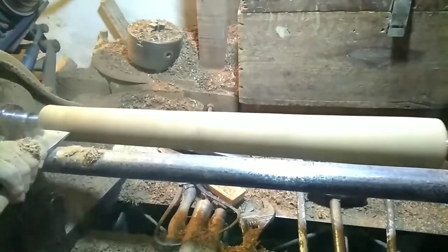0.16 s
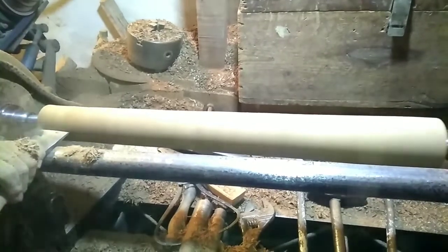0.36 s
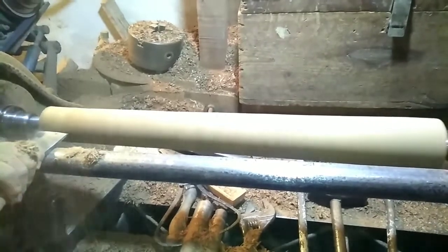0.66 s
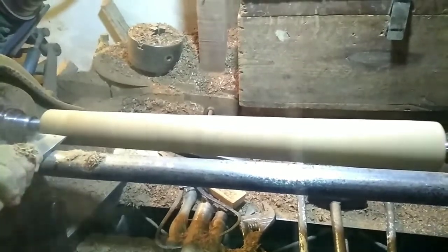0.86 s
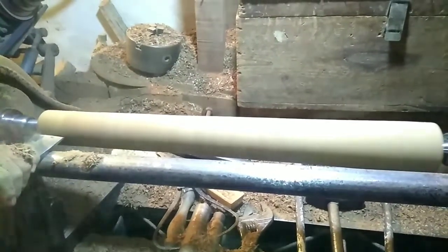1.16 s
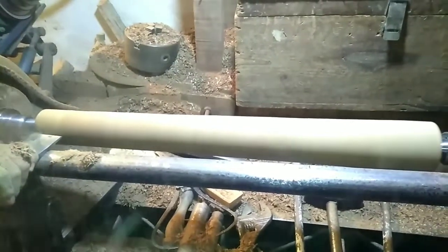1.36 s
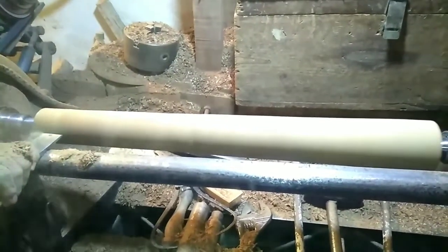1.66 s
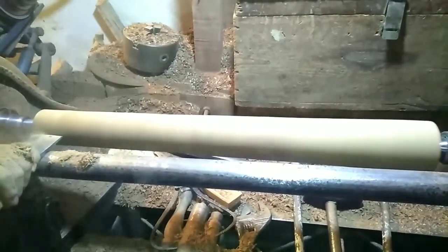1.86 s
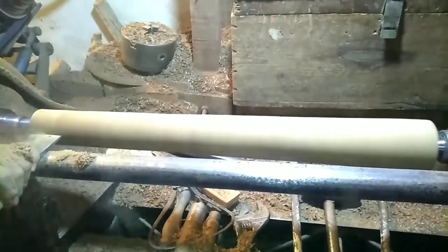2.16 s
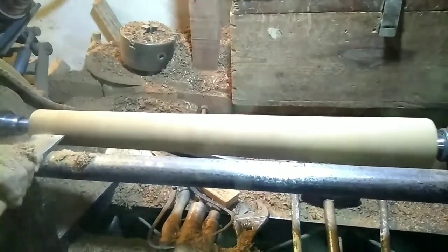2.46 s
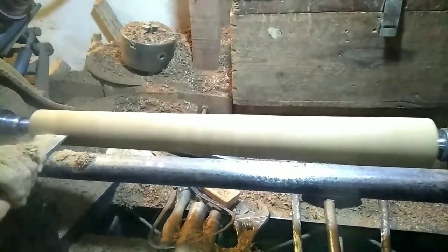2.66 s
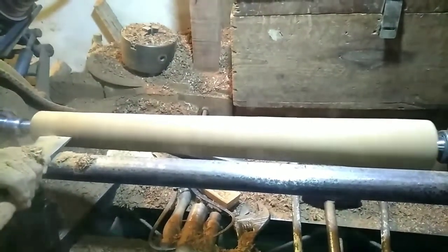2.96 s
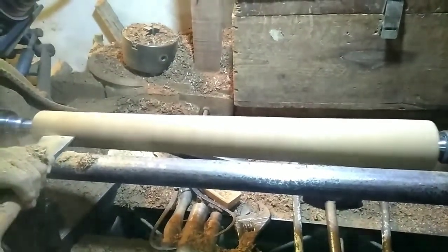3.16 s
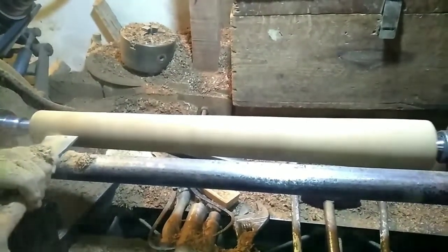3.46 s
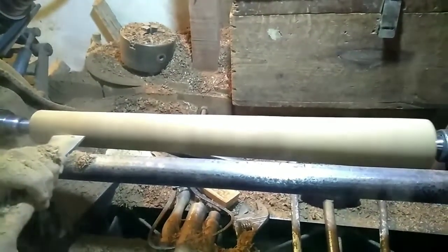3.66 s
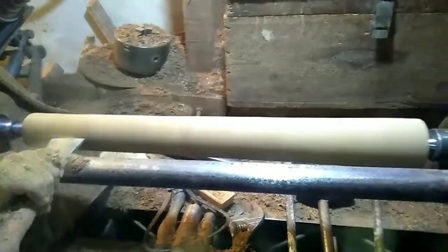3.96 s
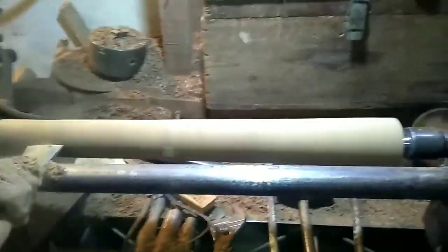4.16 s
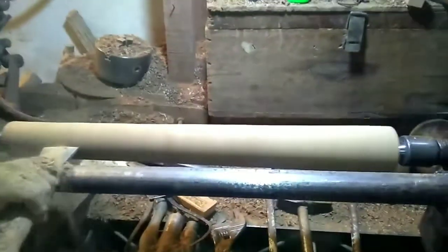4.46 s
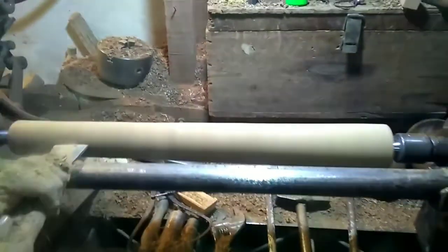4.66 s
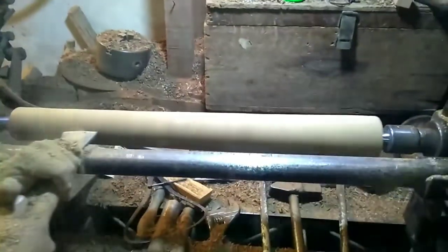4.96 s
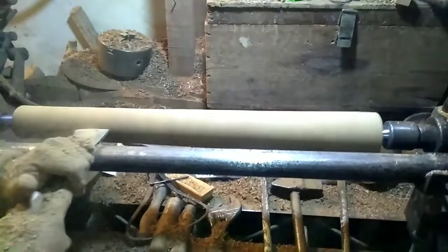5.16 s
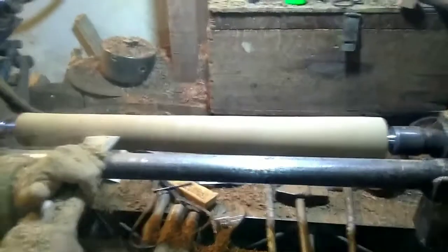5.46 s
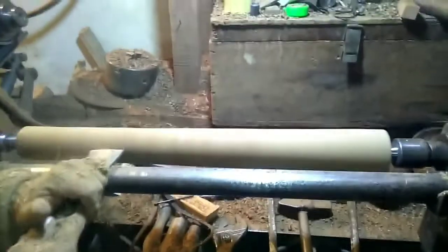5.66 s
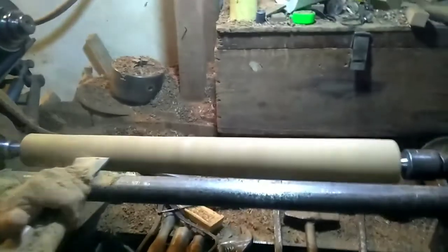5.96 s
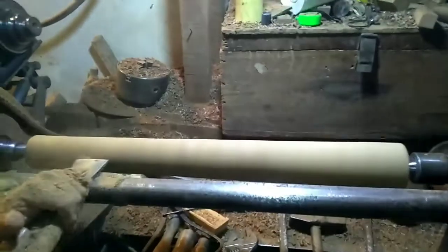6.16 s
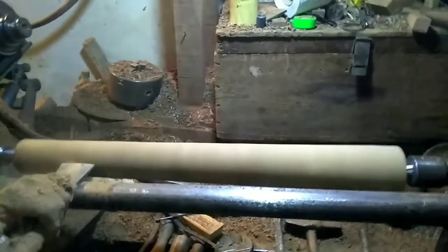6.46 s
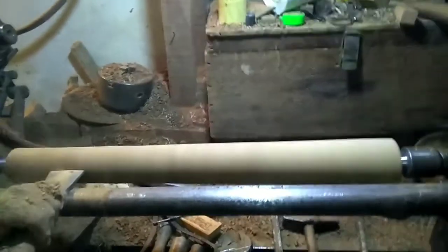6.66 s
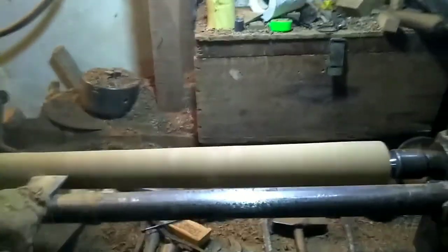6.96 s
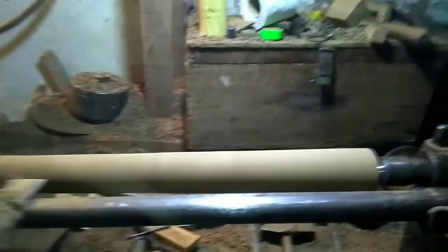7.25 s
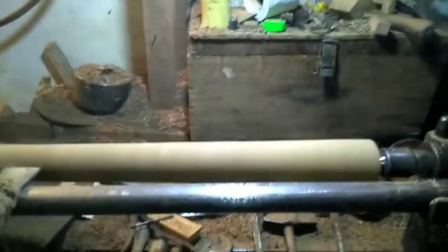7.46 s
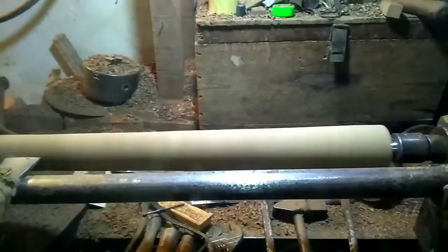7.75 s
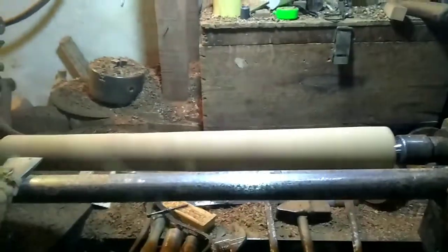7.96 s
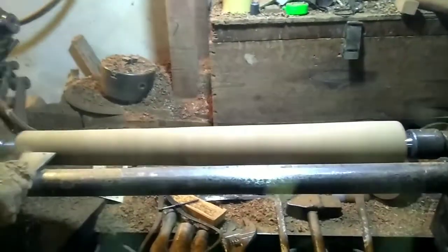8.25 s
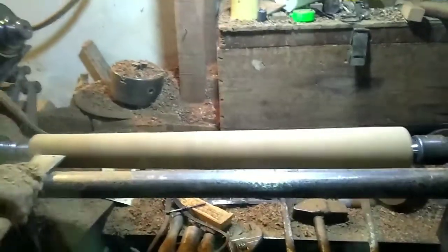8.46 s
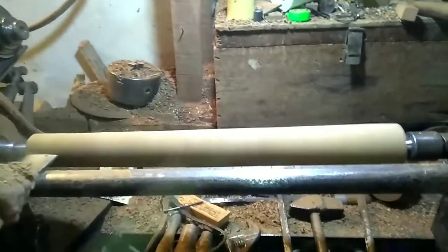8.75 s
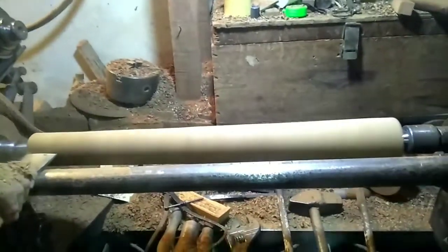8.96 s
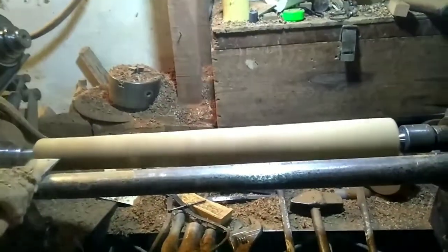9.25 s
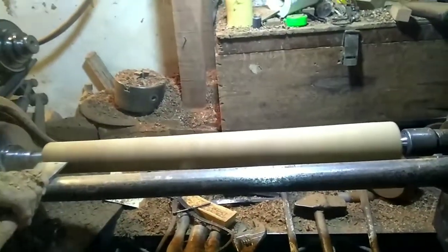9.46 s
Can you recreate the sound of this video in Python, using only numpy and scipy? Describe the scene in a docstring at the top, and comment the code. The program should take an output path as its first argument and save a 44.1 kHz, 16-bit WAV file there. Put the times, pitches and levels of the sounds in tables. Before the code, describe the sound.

A flat hand tool shaves a long wooden blank spinning on a lathe, close by in a small workshop. The scraping hiss pulses rapidly at first, with ringing chatter, short squeaks and crackling chips. Midway the cut turns into a freer, sputtering ring with a thin high squeal. The edge catches sharply several times, then the pulsing shaving returns. A motor hum and bearing rumble run underneath.

```python
"""A long wooden blank chatters on a lathe in a small workshop while a flat hand tool shaves along it.
Once a turn the high side bites the edge: the shaving hiss pulses and blank and tool ring, in step with
the spindle at both ends of the pass and freely in between. The steel squeals thinly; now and then it
digs in, catches or skids, and chips fly. Underneath, the rubbing bevel shakes the bed, the motor hums
and the bearings rumble."""
import sys
import numpy as np
from scipy import signal
from scipy.fft import rfft, irfft
from scipy.io import wavfile
from scipy.ndimage import uniform_filter1d

SR = 44100
rng = np.random.default_rng(int(sys.argv[2]) if len(sys.argv) > 2 else 0)


def persist_wave(psi):
    """Save psi, clipped to +-1, as 16-bit WAV."""
    counts = np.round(np.clip(psi, -1, 1) * 32767).astype(np.int16)
    wavfile.write(sys.argv[1], SR, np.atleast_2d(counts).T)


N = 423360

SPINDLE_HZ = 39.4
LOWER_HZ, MIDDLE_HZ = 1668, 1785  # bending modes of the blank
ROCK_HZ, ROCK_DB, ROCK_TOP_S = 2.5, 0.86, 0.039  # the tool rocks in and out of the cut at first
CHATTER_FOLLOWS, TOOL_FOLLOWS, HISS_FOLLOWS = 0.97, 1.8, 0.94  # dB per dB of hand pressure

# how the edge meets the wood:
# (time [s], bite start [turns], bite length [turns], chatter swell [turns], in step [0-1])
BITE = [(0, 0.48, 0.21, 0.23, 0.8), (.45, 0.55, 0.22, 0.2, 0.74), (1.2, 0.5, 0.15, 0.21, 0.64),
        (2.0, 0.52, 0.17, 0.18, 0.84), (2.35, 0.57, 0.13, 0.17, 0.77), (2.6, 0.51, 0.13, 0.58, 0.7),
        (3.1, 0.48, 0.18, 0.14, 0.58), (3.4, 0.42, 0.083, 0.24, 0.6), (3.7, 0.41, 0.12, 0.083, 0.2),
        (4.7, -0.19, 0.11, 0.062, 0), (6.3, -0.064, 0.1, 0.15, 0.18), (7.4, 0.089, 0.16, 0.12, 0),
        (7.7, 0.065, 0.23, 0.17, 0.41), (8.1, -0.068, 0.1, 0.23, 0.64), (8.4, -0.054, 0.38, 0.17, 0.79),
        (8.75, -0.097, 0.18, 0.15, 0.71), (9.0, -0.1, 0.19, 0.16, 0.83), (9.6, -0.13, 0.13, 0.22, 0.84)]
# the hand leans in (+) or eases off (-): (time [s], half-length [s], pressure [dB])
NUDGES = [(1.486, 0.03, -3.5), (1.84, 0.017, -1), (3.576, 0.064, 1), (4.06, 0.045, -2), (4.42, 0.027, 1.5),
          (5.455, 0.044, -4), (5.736, 0.041, -2), (6.265, 0.04, 1.5), (6.658, 0.02, -2), (6.771, 0.013, -5),
          (7.451, 0.023, -4.5), (7.538, 0.047, -4.5), (7.62, 0.058, 2), (7.827, 0.024, 1.5),
          (8.653, 0.028, 0.5), (8.737, 0.03, -5), (9.352, 0.034, 2.5)]

# faders of the blank's three bending modes, before trim: (time [s], level [dB])
LOWER_CHATTER = [(0, -43), (.4, -40), (.65, -51), (1.0, -48), (1.3, -47.5), (1.45, -40), (1.8, -47),
                 (1.94, -37.5), (2.08, -44), (2.3, -36.5), (2.48, -57), (3.0, -48.5), (3.5, -52),
                 (4.45, -53), (4.75, -62), (4.95, -51), (5.6, -48), (6.1, -54), (7.3, -50.5), (8.15, -41),
                 (8.43, -34), (8.8, -40), (9.0, -35), (9.3, -36), (9.6, -40)]
MIDDLE_CHATTER = [(0, -41.5), (.25, -51), (.4, -43), (.6, -47), (1.1, -56), (1.35, -44), (1.5, -48),
                  (1.62, -40.5), (1.83, -52), (1.95, -41), (2.25, -40), (2.55, -66), (3.3, -50),
                  (3.7, -44.5), (4.05, -43), (4.4, -42), (4.8, -50), (5.1, -44), (5.4, -44), (5.56, -45),
                  (5.7, -60), (9.6, -64)]
UPPER_CHATTER = [(0, -64), (.4, -49), (.95, -52), (1.6, -44.5), (2.1, -46), (2.6, -53), (3.35, -51),
                 (3.72, -43), (4.0, -43.5), (4.7, -40), (5.52, -43), (5.68, -51.5), (5.9, -43.5),
                 (6.55, -38.5), (7.0, -48), (7.95, -59), (8.38, -47), (8.7, -52), (9.6, -53.5)]
# the upper mode climbs as the tool leaves the end of the blank: (time [s], pitch [Hz])
UPPER_PITCH = [(0, 1860), (2.2, 1860), (3.7, 1875), (5.5, 1885), (6.2, 1900), (7.4, 1900), (9.6, 1915)]
# it is gripped and swells (+) or slips and fades (-): (time [s], half-length [s], gain [dB])
UPPER_SWELLS = [(3.577, 0.015, 9), (3.653, 0.012, -14), (3.735, .05, 6.5), (4.02, 0.046, -11),
                (4.249, 0.014, 5), (4.44, 0.022, 3), (4.61, 0.012, 9), (4.82, 0.035, 7), (4.928, .02, -4),
                (5.094, 0.026, -20), (5.32, 0.035, -12), (5.407, 0.018, 8), (5.468, 0.028, 13.5),
                (5.557, 0.024, 5), (5.91, 0.011, -16), (5.95, 0.047, 8), (6.018, 0.045, -3.5),
                (6.268, 0.015, -5), (6.34, .03, 4.5), (6.42, 0.014, 0.5), (6.897, 0.037, -5),
                (7.04, 0.014, 5), (7.24, 0.11, 7.5), (7.426, 0.024, 9)]

# faders of shaving hiss, dust sizzle and chip crackle, before trim: (time [s], level [dB])
SHAVING_LEVEL = [(0, -45.5), (.4, -44.5), (1.1, -44), (1.6, -45.5), (2.1, -50.5), (2.5, -42.5),
                 (3.1, -43.5), (3.6, -44.5), (4.45, -48), (4.9, -44.5), (5.6, -47), (6.3, -45),
                 (7.0, -46.5), (7.54, -44.5), (7.6, -43.5), (8.35, -44.5), (8.45, -48), (9.1, -48.5),
                 (9.6, -46.5)]
DUST_LEVEL = [(0, -49), (.7, -51), (1.05, -43), (1.45, -57), (2.1, -47), (2.62, -45), (2.96, -45),
              (3.3, -43), (3.8, -45.5), (5.2, -47.5), (7.4, -47.5), (7.7, -48), (8.3, -46), (9.1, -53),
              (9.5, -51)]
CRACK_LEVEL = [(0, -53), (.7, -50), (1.4, -49.5), (2.1, -54.5), (2.4, -52), (3.1, -54), (3.7, -70),
               (7.5, -68), (7.7, -59), (8.7, -64), (8.85, -49), (9.05, -50), (9.25, -60), (9.36, -59),
               (9.6, -63)]
# their tone colours: (frequency [Hz], relative level [dB])
SHAVING_EQ = [(500, -8), (1200, 5), (1700, 13.5), (2200, 5), (2850, -3.5), (4000, 1.5), (4600, 2.5),
              (5000, 0), (5400, 3), (5850, 2), (6380, -5), (7100, 5), (8000, 2.5), (9500, 0.5),
              (12000, -1.5), (16500, 2.5)]
DUST_EQ = [(10000, -10), (12000, -4.5), (13000, -4), (13600, -2), (14200, 2.5), (14900, 5), (15300, 8.5),
           (15600, 7)]
CRACK_EQ = [(2200, -18), (3500, 8), (5500, 0), (8000, -2), (13000, -15)]
# how much the flat of the edge rings in the hiss: (time [s], share [0-1])
FLAT_SHARE = [(0, 0.16), (2.2, 0.27), (2.45, 0.06), (3.3, 0.16), (3.65, 0.35), (4.0, 0.52), (4.8, 0.38),
              (6.5, 0.38), (7.4, 0.38), (7.7, 0.12), (9.6, 0.22)]

# resonances of the edge's flat, the struck tool, the rubbed tool, the rasp and ripping fibres:
# (frequency [Hz], width [Hz], gain [dB])
FLAT_MODES = [(6316, 206, 12.6), (8030, 620, 10.3), (10240, 1400, 1.6)]
STRUCK_MODES = [(2060, 320, -5), (2502, 23, 8), (3313, 114, -1.5), (3620, 98, 3), (4200, 380, -11)]
RUBBED_MODES = [(2904, 130, 0.5), (3395, 230, 9.5), (3720, 200, 5), (4190, 250, 5.5)]
RASP_MODES = [(2040, 110, -1.5), (2410, 140, -10), (3650, 150, -3.5), (4040, 120, -2), (4400, 300, -6)]
RIP_MODES = [(1760, 590, 0), (4000, 3000, -16)]
# faders of the tool's ring and the edge's squeal, before trim: (time [s], level [dB])
TOOL_LEVEL = [(0, -54.5), (.6, -50), (1.2, -48), (2.05, -48.5), (2.55, -52.5), (2.9, -55), (4.4, -53.5),
              (4.9, -51), (5.7, -52.5), (6.95, -55), (7.2, -52.5), (7.8, -55), (8.2, -46), (8.6, -55.5),
              (8.85, -50), (8.98, -56), (9.24, -66), (9.34, -57), (9.55, -51.5)]
SQUEAL_LEVEL = [(0, -61.5), (.65, -51), (1.35, -63.5), (1.9, -57), (2.5, -58.5), (2.92, -48.5), (3.4, -58),
                (3.95, -49), (4.25, -53.5), (5.4, -52), (6.5, -60.5), (7.95, -69), (8.4, -63), (9.6, -68)]
# the thin note of the freely rubbing tool: (time [s], pitch [Hz])
SING_PITCH = [(3.6, 3435), (5.5, 3425), (6.6, 3380), (7.4, 3375), (8.2, 3440)]

# the tool digs in: (time [s], half-length [s], level [dB])
DIGS = [(0.05, 0.16, -42), (0.42, 0.07, -46.5), (0.845, 0.037, -46), (1.276, 0.094, -45.5),
        (1.628, 0.048, -42.5), (1.782, 0.038, -44), (1.9, 0.046, -44.5), (2.046, 0.057, -42),
        (2.228, 0.033, -49), (7.61, .025, -57), (8.825, 0.083, -50)]
# deep cuts spray shavings: (time [s], half-length [s], pitch [Hz], level [dB])
SPRAYS = [(.75, 0.43, 5330, -54), (.06, .09, 2300, -46), (0.884, .09, 2280, -53), (1.094, 0.058, 3400, -49),
          (1.19, 0.031, 2330, -44), (1.699, 0.098, 2400, -47), (2.502, .17, 3640, -51.5),
          (2.6, .22, 4940, -57), (2.55, 0.32, 8950, -51.5), (2.63, .14, 15100, -40),
          (2.78, 0.18, 7200, -49), (3.1, 0.28, 5420, -50), (3.086, 0.12, 8700, -43.5),
          (3.1, .3, 10100, -61), (3.2, 0.12, 7850, -57), (3.334, 0.16, 8850, -50), (7.69, .045, 5650, -50),
          (7.694, 0.057, 8990, -47.5), (7.848, 0.26, 10210, -56), (8.0, 0.068, 5400, -55),
          (8.157, 0.18, 3530, -58), (8.847, 0.065, 3324, -49), (9.08, 0.081, 5570, -55),
          (9.15, 0.12, 7060, -57), (9.35, .035, 5450, -53), (9.35, 0.044, 7250, -51)]
# the edge catches: (time [s], rise [s], pitch [Hz], level [dB])
CATCHES = [(6.64, 0.0029, 1720, -27), (6.726, 0.0065, 1700, -30), (6.814, 0.0092, 1750, -34.5),
           (7.221, 0.0058, 1765, -34), (7.348, 0.0044, 1703, -32.5), (7.574, 0.0053, 1670, -28.5),
           (7.817, 0.006, 1688, -39)]
# the edge skids: (time [s], rise [s], pitch sag [Hz], level [dB])
SQUEAKS = [(.092, .003, 250, -35), (.218, .003, 250, -33), (1.052, .0035, 350, -33),
           (1.077, 0.0032, 350, -30), (1.102, .0035, 250, -38), (1.332, .003, 250, -42),
           (1.358, 0.0034, 350, -36), (1.486, .003, 350, -35), (1.716, 0.0033, 300, -39),
           (7.152, .009, 50, -47), (7.178, 0.0055, 50, -42), (7.471, 0.0051, 50, -38.5),
           (7.574, 0.0062, 79.7, -34.5), (9.49, .003, 200, -38), (9.513, 0.0024, 200, -38)]
# chips land close by: (time [s], level [dB])
CHIPS = [(0.029, -37), (0.099, -50), (1.185, -37), (1.308, -35), (1.618, -39), (1.643, -56), (2.045, -43)]

# fader of the rubbing bevel, before trim: (time [s], level [dB])
RUB_LEVEL = [(0, -54.5), (2.1, -54.5), (2.45, -52), (3.9, -49.5), (5.2, -47.5), (6.3, -47), (6.6, -50),
             (7.85, -48.5), (8.4, -50.5), (9.0, -57), (9.6, -56.5)]
# broad resonances of blank and bed: (frequency [Hz], width [Hz], gain [dB])
BODY_MODES = [(172, 50, -8.5), (358, 67, -6), (457, 55, 0), (669, 42, -2.5), (801, 67, -2), (936, 100, 1.5),
              (1054, 134, -1), (1192, 85, 1), (1590, 200, -5), (2513, 53, 0.5)]
# the motor's narrow hum tones: (frequency [Hz], width [Hz], relative level [dB])
MOTOR_TONES = [(161, 2, -20), (183, 3, -14.5), (195, 4, -19), (381, 4, -20), (434, 3, -15.5),
               (457, 3.5, -11.5), (676, 4, -19), (717, 4, -11), (733, 3, -15), (898, 6, -15),
               (1015, 5, -17), (1100, 4, -15), (1230, 6, -16)]
# the tool rest drones under the hand: (time [s], level [dB])
DRONE_LEVEL = [(0, -91), (6.2, -68.5), (6.55, -65), (6.9, -60.5), (7.25, -60.5), (7.5, -68.5), (9.6, -85)]
# colour of the bearing rumble: (frequency [Hz], relative level [dB])
BEARING_EQ = [(20, 10), (45, 0.5), (80, -1), (125, 6), (165, -22), (210, 6.5), (280, -5.5), (430, -11),
              (600, -2), (1200, -1), (4000, 8)]


def blank_chatter(t, since, swing, in_step, hand_db, pressure):
    """The blank's close bending modes: rough while the tool rocks, sputtering when it rubs freely."""
    rock_slip = 0.35 * rocking(t)  # radians

    def bent_mode(hz, width_hz):
        """Shifting pressure bends the pitch."""
        bend_hz = (13 * (1 - in_step) + 17 * rocking(t)) * drift(rate=5)
        return bending_mode(hz + bend_hz, width_hz, since, swing, in_step, slip=0.11 + rock_slip)

    lowest = from_db(-10.5) * bending_mode(1520, 120, since, swing, in_step, slip=0.093 + rock_slip)
    sputter = evened(from_db(2.2 * (1 - in_step) * drift(rate=11)), size=11000)
    lower = pressure * soft_clip(bent_mode(LOWER_HZ, width_hz=81) + lowest)
    middle = -sputter * soft_clip(bent_mode(MIDDLE_HZ, width_hz=42))
    upper = sputter * soft_clip(bent_mode(in_time(UPPER_PITCH)[0], width_hz=34))
    grip_db = sum(db * hump(t, s, length) for s, length, db in UPPER_SWELLS)
    return (lower * fader(LOWER_CHATTER, CHATTER_FOLLOWS * hand_db, trim_db=-1)
            + middle * fader(MIDDLE_CHATTER, CHATTER_FOLLOWS * hand_db, trim_db=-1)
            + upper * fader(UPPER_CHATTER, CHATTER_FOLLOWS * hand_db + grip_db, trim_db=-0.2))


def bending_mode(hz, width_hz, since, swing, in_step, slip):
    """One mode, retriggered by each bite or kept going by uneven friction."""
    burst = evened(np.tanh(swing / 2.1))  # friction rounds the top
    struck = np.sqrt(2) * burst * np.sin(2 * np.pi * hz * since + slip * drift(rate=190))
    pulse = np.sqrt(0.5 * in_step * burst ** 2 + 1 - 0.5 * in_step)
    free = evened(wavering_tone(hz, width_hz), size=2200) * pulse
    return blend(struck, free, np.sin(np.pi / 2 * in_step) ** 2)


def bite(angle, length, uneven_db):
    """Seconds since the high side met the edge, and a push that swells and fades within the turn."""
    turns = np.arange(N) / SR * SPINDLE_HZ - angle + 2
    part = turns % 1
    age = part / np.maximum(length, 0.03)
    push = age ** 2.33 * np.exp(-1.5 * age) * (1 - part ** 8)
    accents = rng.standard_normal(int(N / SR * SPINDLE_HZ) + 5)  # one a turn
    return part / SPINDLE_HZ, evened(push * from_db(uneven_db * accents[turns.astype(int)]))


def hand(t, in_step):
    """The hand's pressure in dB: it rocks at first, then wavers, and now and then gives a nudge."""
    rock_db = ROCK_DB * rocking(t) * np.cos(2 * np.pi * ROCK_HZ * (t - ROCK_TOP_S))
    waver_db = 0.8 * (1 - in_step) * drift(rate=6)
    return rock_db + waver_db + sum(db * hump(t, s, length) for s, length, db in NUDGES)


def rocking(t, settles_s=2.7, fade_s=0.351):
    """1 while the tool rocks at the end of the blank, 0 once it has settled."""
    return (1 - np.tanh((t - settles_s) / fade_s)) / 2


def shaving_hiss(spurt, repeat, hand_db):
    """Broad hiss of the shaving, coloured by the flat of the edge as it lies on the wood."""
    tearing = coloured(fibres(repeat, grain_db=2.5), SHAVING_EQ)
    flat = unit_power(resonate(rng.standard_normal(N), FLAT_MODES))
    hiss = evened(blend(flat, tearing, in_time(FLAT_SHARE)[0]))
    return fader(SHAVING_LEVEL, HISS_FOLLOWS * hand_db, trim_db=0.94) * spurt * hiss


def dust(spurt, repeat, hand_db):
    """Fine dust sizzles on top of each spurt."""
    sizzle = coloured(fibres(0.5 * repeat, grain_db=3), DUST_EQ)
    return fader(DUST_LEVEL, HISS_FOLLOWS * hand_db) * spurt * sizzle


def fibres(repeat, grain_db):
    """Fibres tear in clumps, partly where they tore on the turn before."""
    def tear():
        return blend(wood_surface(lasting_turns=24), rng.standard_normal(N), repeat)
    clumps = np.minimum(smoothed(tear(), rate=370), 2)
    return unit_power(tear() * from_db(grain_db * clumps))


def wood_surface(lasting_turns):
    """The same grain comes round on every turn and is slowly cut away."""
    turn = round(SR / SPINDLE_HZ)
    fresh = rng.standard_normal((N // turn + 61, turn))
    worn = signal.lfilter([1], [1, -np.exp(-1 / lasting_turns)], fresh, axis=0)
    return unit_power(worn.ravel()[-N:])


def tool_ring(push, pressure, repeat, in_step, hand_db):
    """Torn fibres ring the tool: struck when in step, rubbed and thinly singing when free."""
    struck = evened(resonate(fibres(0.95 * repeat, grain_db=1) * push, STRUCK_MODES))
    rubbed = evened(resonate(fibres(repeat, grain_db=2.5) * pressure, RUBBED_MODES))
    note = wavering_tone(in_time(SING_PITCH)[0], width_hz=18)
    free = blend(note, rubbed, 0.55 * (1 - in_step) ** 2)
    return fader(TOOL_LEVEL, TOOL_FOLLOWS * hand_db, trim_db=2.5) * blend(struck, free, 1.01 * in_step)


def edge_squeal(hand_db):
    """The steel edge squeals, high and fluttering."""
    flutter = from_db(2.5 * drift(rate=3.1))
    tone = wavering_tone(11776, width_hz=41)
    return fader(SQUEAL_LEVEL, HISS_FOLLOWS * hand_db, trim_db=8) * flutter * tone


def digs(t, push, repeat):
    """A few hard bites in a row rasp and wake a high overtone of the tool."""
    envelope = sum(from_db(db) * hump(t, s, length) for s, length, db in DIGS)
    rasp = evened(resonate(fibres(repeat, grain_db=2) * push, RASP_MODES))
    overtone = from_db(-3) * push * wavering_tone(4240, width_hz=70)
    return envelope * (rasp + overtone)


def sprays(t, push, width_hz=310):
    """Deep cuts throw shavings on every turn, each cut with a broad ring of its own."""
    shake = drift(width_hz) + 1j * drift(width_hz)
    out = np.zeros(N)
    for s, length, hz, db in SPRAYS:
        near = np.abs(t - s) < np.pi * length
        tone = np.roll(shake, rng.integers(N))[near] * np.exp(2j * np.pi * hz * t[near])
        out[near] += from_db(db) * hump(t[near], s, length) * tone.real
    return push * out


def cracks(angle, length, repeat):
    """A hard bite opens with a short, dry crackle as a chip breaks off."""
    _, snap = bite(angle, 0.44 * length, uneven_db=3.5)
    return fader(CRACK_LEVEL) * snap * coloured(fibres(repeat, grain_db=5.5), CRACK_EQ)


def catches(t):
    """The edge hooks in: the blank swings up within milliseconds while the fibres rip."""
    envelope = sum(from_db(db) * attack_decay(t, s, rise_s) for s, rise_s, _, db in CATCHES)
    hz, = in_time([(s, hz) for s, _, hz, _ in CATCHES])
    rip = unit_power(resonate(rng.standard_normal(N), RIP_MODES))
    rough_tone = np.sin(2 * np.pi * np.cumsum(hz) / SR + 0.66 * drift(rate=200))
    return envelope * (rough_tone + from_db(-13) * rip)


def squeaks(t, start_hz=3385, sag_s=0.0093):
    """Each skid sets the tool singing; the note sags as the edge loads."""
    out = np.zeros(N)
    for s, rise_s, sag_hz, db in SQUEAKS:
        span = slice(int(s * SR), int(s * SR) + SR // 20)
        hz = start_hz - sag_hz * np.tanh((t[span] - s) / sag_s) ** 2
        tone = np.sin(2 * np.pi * (np.cumsum(hz) / SR + rng.random()))
        out[span] += from_db(db) * attack_decay(t[span], s, rise_s) * tone
    return out


def chips():
    """Flying chips land close by, each a soft tap with a dull puff of noise."""
    hits = np.zeros(N)
    for s, db in CHIPS:
        hits[int(s * SR)] = from_db(db)
    puffs = decaying(hits, decay_s=0.04) * rng.standard_normal(N)
    patter = signal.sosfilt(signal.butter(1, 400, fs=SR, output="sos"), puffs)
    return decaying(hits, decay_s=0.0006) + patter


def bevel_rub(pressure, repeat, hand_db):
    """The rubbing bevel shakes blank and bed; the motor's tones ride on the same fader."""
    rumble = from_db(-0.5) * evened(resonate(fibres(0.4 * repeat, grain_db=2), BODY_MODES))
    return fader(RUB_LEVEL, hand_db, trim_db=0.5) * (rumble + motor_tones()) * pressure


def motor_tones():
    """The motor's narrow hum tones stand out more as the bevel rubs harder."""
    rub_db, = in_time(RUB_LEVEL)
    tones = sum(from_db(db) * wavering_tone(hz, width) for hz, width, db in MOTOR_TONES)
    return from_db(0.98 * (rub_db - rub_db.max())) * tones


def workshop(x, t60):
    """A short diffuse tail from walls and benches."""
    t = np.arange(SR // 2) / SR
    tail = rng.standard_normal(len(t)) * from_db(-60 * t / t60) * (t > 0.004)
    return signal.fftconvolve(x, tail / np.linalg.norm(tail))[:N]


def machine():
    """Bearing rumble, the motor's wavering hum and the drone of the tool rest."""
    rumble = from_db(-55.5) * coloured(rng.standard_normal(N), BEARING_EQ)
    hum = from_db(-71) * wavering_tone(161, width_hz=1.3)
    drone = fader(DRONE_LEVEL) * wavering_tone(129, width_hz=0.97)
    return rumble + hum + drone


def from_db(db):
    """Decibels to gain."""
    return 10 ** (np.asarray(db) / 20)


def in_time(rows):
    """The columns of a curve at every sample."""
    s, *columns = np.transpose(rows)
    return [np.interp(np.arange(N) / SR, s, c) for c in columns]


def fader(curve, ride_db=0, trim_db=0):
    """Gain from a level curve, with a moving ride and a steady trim on top."""
    return from_db(in_time(curve)[0] + ride_db + trim_db)


def unit_power(x):
    """Scale to unit power overall."""
    return x / np.sqrt(np.mean(x ** 2) + 1e-20)


def evened(x, size=4476):
    """Level to unit power over a sliding window, by default four turns long."""
    return x / np.sqrt(np.abs(uniform_filter1d(x ** 2, size)) + 1e-12)


def soft_clip(x, ceiling=4.5):
    """Friction rounds off the widest swings; unit power."""
    return evened(np.tanh(x / ceiling))


def blend(a, b, share):
    """Equal-power crossfade: this share of a, the rest of b."""
    share = np.clip(share, 0, 1)
    return np.sqrt(share) * a + np.sqrt(1 - share) * b


def smoothed(x, rate):
    """Keep the changes slower than the rate in Hz; unit power."""
    hz = np.arange(N // 2 + 1) * SR / N
    return unit_power(irfft(rfft(x) / (1 + (hz / rate) ** 2), N))


def drift(rate):
    """Smooth random modulation; unit power."""
    return smoothed(rng.standard_normal(N), rate)


def coloured(x, eq):
    """Shape a noise with an EQ curve, shut off beyond its ends; unit power."""
    hz, db = np.transpose(eq)
    log_hz = np.log(np.arange(N // 2 + 1) * SR / N + 1)
    gain = from_db(np.interp(log_hz, np.log(hz), db, left=-60, right=-60))
    return unit_power(irfft(rfft(x) * gain, N))


def resonate(x, modes):
    """Parallel resonances of alternating polarity."""
    out = 0
    for k, (hz, width, db) in enumerate(modes):
        r = np.exp(-np.pi * width / SR)
        poles = [1, -2 * r * np.cos(2 * np.pi * hz / SR), r * r]
        band = (1 - r * r) / 2 * signal.lfilter([1, 0, -1], poles, x + 1e-18)
        out = out + (-1) ** k * from_db(db) * band
    return out


def wavering_tone(hz, width_hz):
    """A narrow band of noise heard as a tone, whose centre may move."""
    phase = 2 * np.pi * np.cumsum(hz * np.ones(N)) / SR
    return evened(drift(width_hz) * np.cos(phase) + drift(width_hz) * np.sin(phase))


def hump(t, s, half_length):
    """A smooth swell of height 1 around a moment."""
    return np.exp(-((t - s) / half_length) ** 2)


def attack_decay(t, s, rise_s):
    """Builds up to 1 over the rise time, then dies away."""
    age = np.clip((t - s) / rise_s, 0, 30)
    return (age * np.exp(1 - age)) ** 2


def decaying(hits, decay_s):
    """Give each hit an exponential tail."""
    return signal.lfilter([1], [1, -np.exp(-1 / (decay_s * SR))], hits + 1e-18)


def scene():
    """The cut, pulsing with the spindle, over the running machine."""
    t = np.arange(N) / SR
    angle, length, swell, in_step = in_time(BITE)
    hand_db = hand(t, in_step)
    angle = angle + 0.0072 * (1 - in_step) * drift(rate=1.1)
    # while the tool rocks, no two bites are alike
    jitter_turns = 0.008 * rocking(t) * drift(SPINDLE_HZ)
    uneven_db = 0.8 * rocking(t)
    _, push = bite(angle + jitter_turns, length, uneven_db)
    since, swing = bite(angle, swell, uneven_db)
    # in step, the hand is steadier, the grain repeats more and the hiss pulses deeper
    pressure = evened(from_db(0.64 * (2 - 1.13 * in_step) * drift(rate=18)), size=11000)
    repeat = 0.076 + in_step
    depth = 0.26 + 0.18 * in_step
    spurt = evened(np.sqrt(depth * push ** 2 + 1 - depth)) * pressure  # one a turn

    cut = blank_chatter(t, since, swing, in_step, hand_db, pressure)
    cut += tool_ring(push, pressure, repeat, in_step, hand_db) + edge_squeal(hand_db)
    cut += shaving_hiss(spurt, repeat, hand_db) + dust(spurt, repeat, hand_db)
    cut += bevel_rub(pressure, repeat, hand_db)
    cut += digs(t, push, repeat) + sprays(t, push) + cracks(angle, length, repeat)
    cut += catches(t) + squeaks(t) + chips()
    return (cut + from_db(-13) * workshop(cut, t60=0.21) + machine())[None]


def record(dry):
    """A steep high cut takes off the very top."""
    return signal.sosfilt(signal.ellip(12, 0.2, 80, 15480, fs=SR, output="sos"), dry)


dry = scene()
out = record(dry)
persist_wave(out)
```